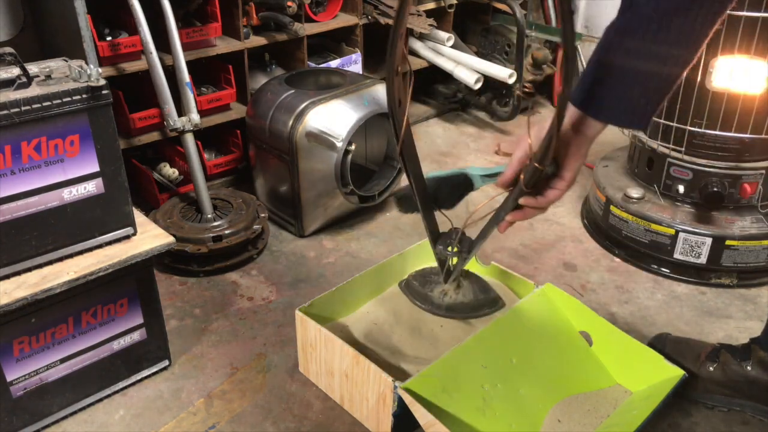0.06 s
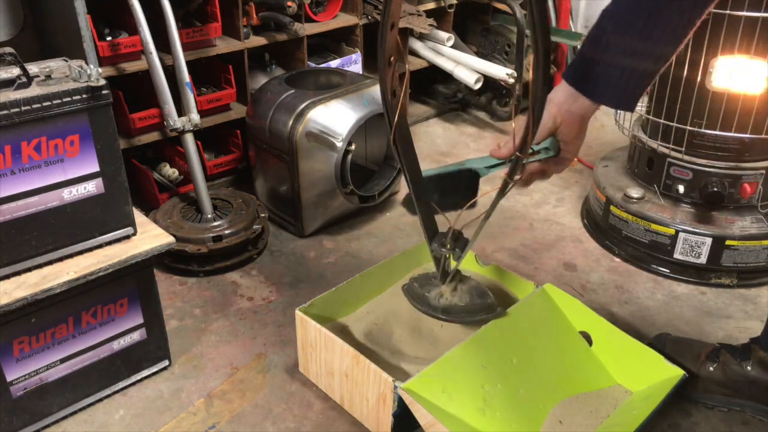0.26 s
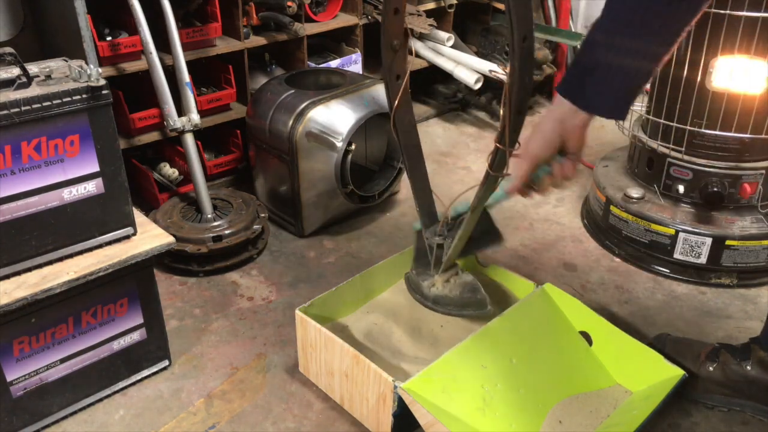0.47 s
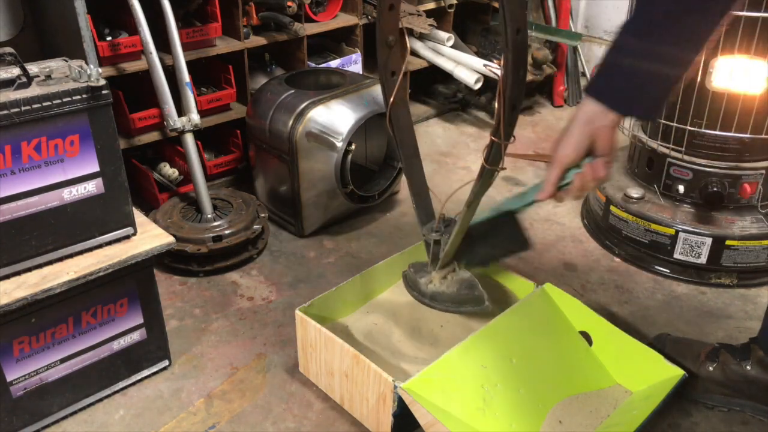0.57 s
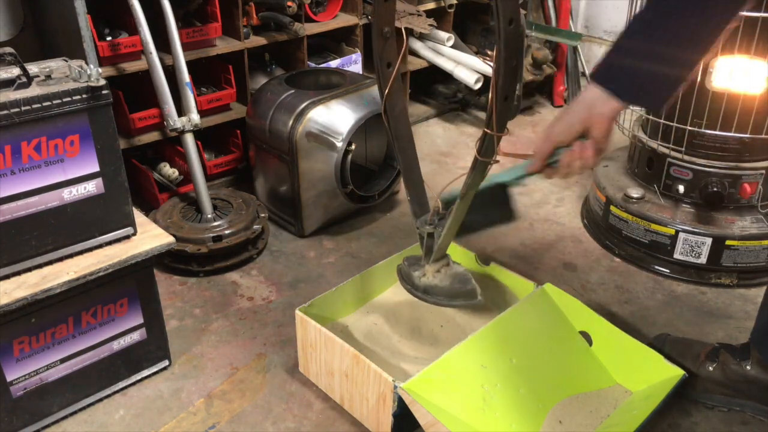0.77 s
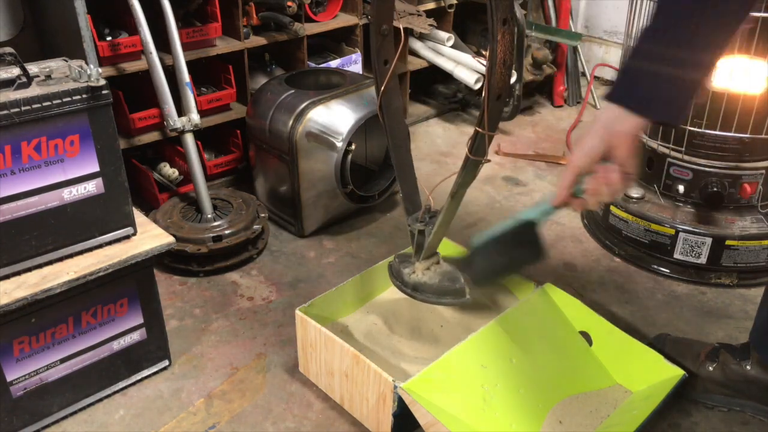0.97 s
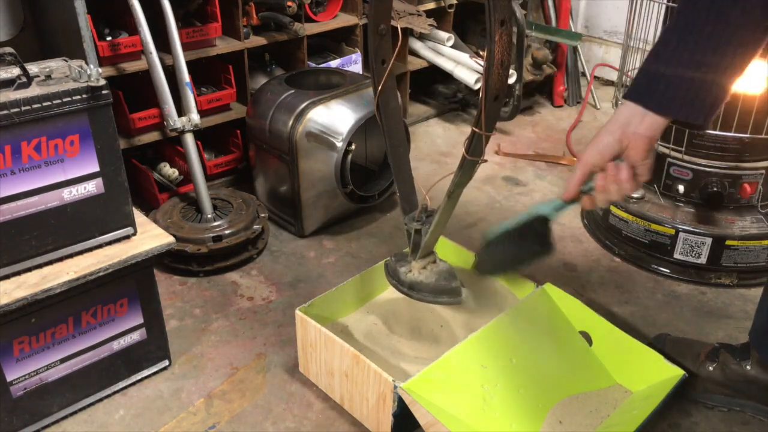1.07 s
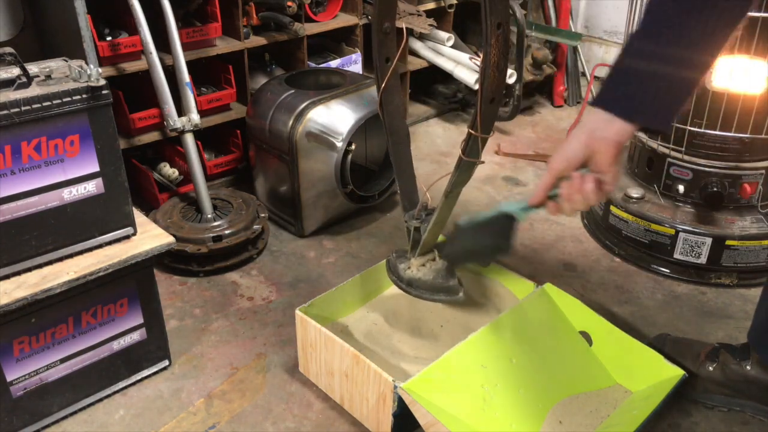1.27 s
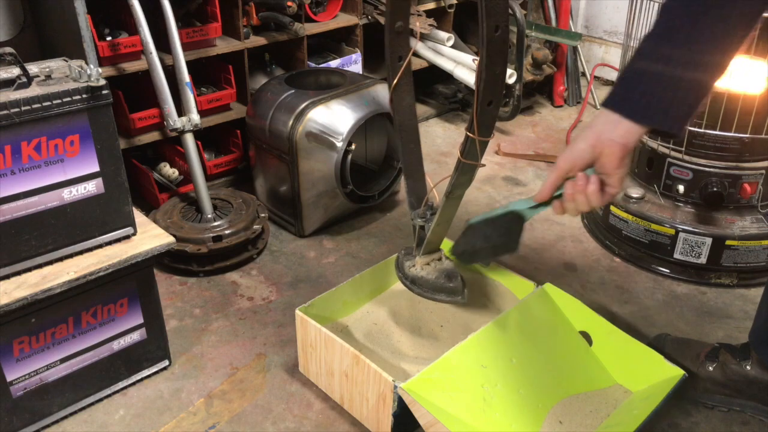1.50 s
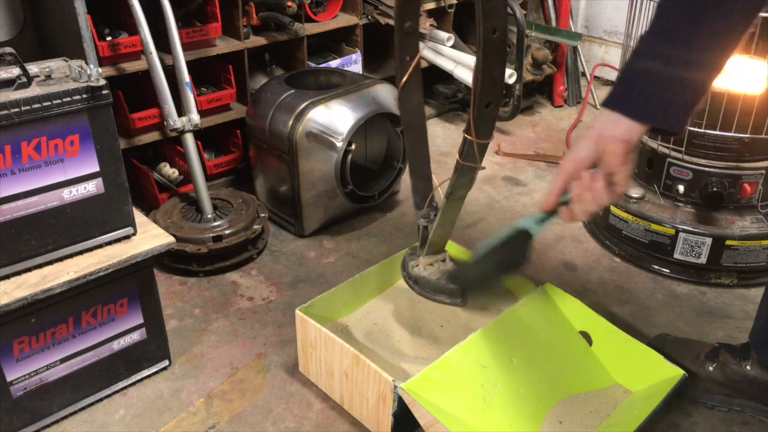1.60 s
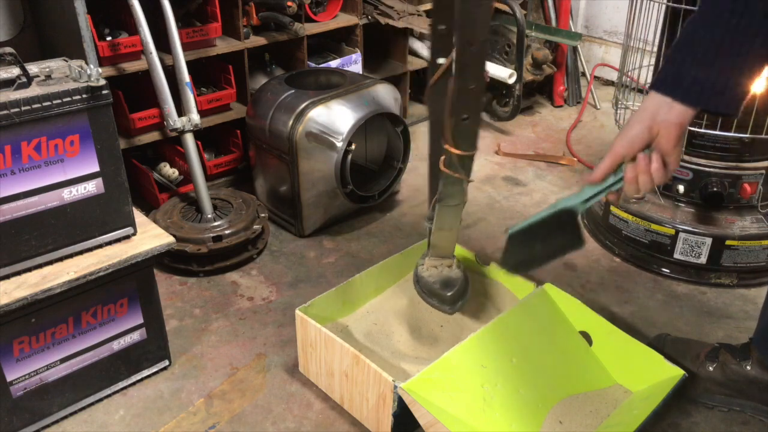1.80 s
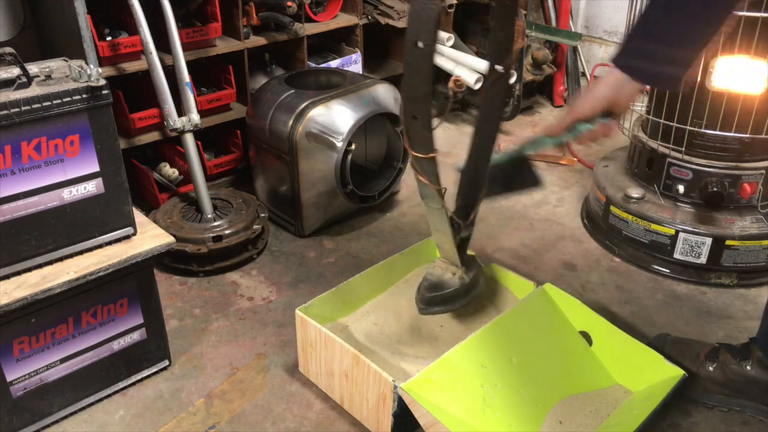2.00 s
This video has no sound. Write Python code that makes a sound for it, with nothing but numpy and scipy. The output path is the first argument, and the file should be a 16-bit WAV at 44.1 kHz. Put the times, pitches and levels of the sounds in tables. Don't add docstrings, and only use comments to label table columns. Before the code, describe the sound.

Stiff bristles scratch and hiss across a sandy iron casting, with small knocks, in a garage

```python
import sys
import numpy as np
from scipy import signal
from scipy.fft import rfft, irfft, next_fast_len
from scipy.io import wavfile

SR = 44100
rng = np.random.default_rng(int(sys.argv[2]) if len(sys.argv) > 2 else 0)


def convert_level_to_amplitude(level_db):
    exponent = np.asarray(level_db, float) / 20
    return 10 ** exponent


def master_out(mix):
    frames = np.transpose(np.atleast_2d(mix))
    ceiling = np.clip(frames, -1, 1)
    pcm = np.round(ceiling * 32767).astype(np.int16)
    wavfile.write(sys.argv[1], SR, pcm)


N = 90404
SETTLE_T60_S = 0.11


def rms_one(x):
    return x / np.sqrt(np.mean(x ** 2) + 1e-20)


def drift(rate_hz):
    r = np.exp(-80 * np.pi * rate_hz / SR)
    noise = rng.standard_normal(N // 40 + 2002)
    slow = signal.lfilter([1], [1, -2 * r, r * r], noise)[2000:]
    return np.interp(np.arange(N) / 40, np.arange(len(slow)), rms_one(slow))


def resonate(x, hz, width_hz):
    r = np.exp(-np.pi * width_hz / SR)
    zeros = np.array([1, 0, -1]) * (1 - r * r) / 2
    poles = [1, -2 * r * np.cos(2 * np.pi * hz / SR), r * r]
    return signal.lfilter(zeros, poles, x + 1e-18)


def high(x, hz):
    return signal.sosfilt(signal.butter(2, hz, "high", fs=SR, output="sos"), x)


def coloured(pair, spectrum, patchy_db, control_db=0, tilt=0):
    out, table = 0, np.array(spectrum)
    edges = 18 * 2 ** np.arange(0, 10.1, 1 / 3)
    for k, (low, top) in enumerate(zip(edges, edges[1:])):
        hz = np.sqrt(low * top)
        if hz > .7 * table[0, 0]:
            level_db = np.interp(np.log(hz), np.log(table[:, 0]), table[:, 1])
            level_db = level_db + patchy_db * drift(16.0)
            back_db = -tilt * control_db * np.clip(np.log2(12000 / hz) / 2, 0, 1)
            band = signal.butter(2, [low, top], "band", fs=SR, output="sos")
            out = out + convert_level_to_amplitude(level_db + back_db) * signal.sosfilt(band, pair[k % 2])[-N:]
    return rms_one(out)


def settle(env, t60_s):
    fall_db = 60 / t60_s * np.arange(N) / SR
    return convert_level_to_amplitude(np.maximum.accumulate(20 * np.log10(env + 1e-9) + fall_db) - fall_db)


# f/Hz, level/dB per Hz
RUMBLE = [(30, -34), (54, -1), (120, -0.5), (164, -5.5), (215, -14), (341, -17), (803, -24.5),
          (1800, -29.5), (4000, -32), (15400, -37)]
# f/Hz, level/dB rms
FAN_LINES = [(29.3, -64), (58, -64)]


def heater():
    t = np.arange(N) / SR
    lines = sum(convert_level_to_amplitude(db) * np.sqrt(2) * np.sin(2 * np.pi * hz * t) for hz, db in FAN_LINES)
    noise = rng.standard_normal((2, N + SR // 2))
    return convert_level_to_amplitude(-54) * coloured(noise, RUMBLE, 0.86) + lines


def garage(x):
    t60_s = 0.18
    size = next_fast_len(N + SR)
    w = 2 * np.pi * np.arange(size // 2 + 1) / size
    lags = rng.uniform(.008, 0.039, 10) * SR
    wet = 0
    for k, lag in enumerate(lags):
        loop = convert_level_to_amplitude(-60 * lag / SR / t60_s) * np.exp(-1j * w * lag)
        wet = wet + (-1) ** k * (1 / (1 - loop) - 1)
    return irfft(rfft(x, size) * wet / (1 + 1j * w / 2.4), size)[:N]


def grains():
    per_s, spread_db = 14000, 2.5
    sizes = convert_level_to_amplitude(spread_db * np.minimum(rng.exponential(1, N), 5)) * rng.choice([-1, 1], N)
    return rms_one(sizes * (rng.random(N) < per_s / SR))


# t/s, peak level/dB, f/Hz
STRAY_GRAINS = [(1.7934, -43, 13500), (1.8215, -45, 6000), (1.836, -44, 11100), (1.8415, -37, 13000),
                (1.8534, -48, 14000), (1.8725, -42, 7000), (1.8854, -39, 13000), (1.9014, -55, 5950),
                (1.9265, -35.5, 14000), (1.9354, -44, 12000), (1.9564, -52, 14400), (1.9607, -40.5, 6500),
                (.1098, -42, 14500), (1.9894, -52, 13500)]


def strays():
    t60_s = .004
    out, t = np.zeros(N), np.arange(600) / SR
    for s, db, hz in STRAY_GRAINS:
        i = int(s * SR)
        burst = convert_level_to_amplitude(-60 * t / t60_s) * rng.standard_normal(600)
        out[i:i + 600] += convert_level_to_amplitude(db - 5) * resonate(burst, hz, 5000)
    now = np.arange(N) / SR
    trickle = np.where((now >= 1.4) & (now <= 1.9), convert_level_to_amplitude(-63), 0)
    return out + settle(trickle, SETTLE_T60_S) * high(high(grains(), 9000), 9000)


# t/s, length/s, level/dB, f/Hz, width/Hz
BOX_DRAGS = [(-0.004, 0.18, -61.5, 310, 68), (0.108, 0.044, -56, 1280, 1190), (.244, 0.04, -47.5, 234, 151),
             (.245, 0.054, -51.5, 730, 402), (0.296, 0.051, -48.5, 600, 600), (0.355, 0.028, -47, 503, 480),
             (0.369, 0.01, -49.5, 1410, 800), (0.775, 0.13, -63, 1110, 604), (1.212, 0.03, -61.5, 980, 120),
             (1.875, 0.053, -67.5, 1947, 30), (1.91, 0.023, -62, 3720, 150),
             (1.918, 0.035, -64.5, 2006, 40)]


def box():
    t, out, rough = np.arange(N) / SR, 0, rng.standard_normal(N)
    for s, length, db, hz, width_hz in BOX_DRAGS:
        age = np.clip((t - s) / length, 0, 9)
        swell = 2.94 * age * np.exp(-1.6 * age ** 2)
        out = out + convert_level_to_amplitude(db) * swell * rms_one(resonate(rough, hz, width_hz))
    return out


# t/s, peak level/dB, f/Hz, t60/s
HARD_KNOCKS = [(.0655, -57, 6600, 0.025), (.072, -53, 6300, .015), (.069, -51, 3800, .015),
               (1.3225, -47, 1780, .03), (1.6262, -52, 1800, .03), (0.1264, -47.5, 1022, 0.044),
               (.1262, -43, 2000, .015), (.1262, -46, 3900, .01), (.2475, -36, 240, 0.05),
               (.251, -35, 310, .045), (.247, -43, 707, 0.065), (.2515, -35, 800, .03),
               (.258, -41.5, 438, 0.077), (.261, -48, 6850, .015), (.292, -40, 650, .03),
               (0.297, -34, 525, 0.03), (.313, -42, 620, .02), (.326, -42, 600, .025),
               (0.3619, -20, 3220, 0.008), (.3622, -27, 14500, .005), (.3622, -30, 9800, .005),
               (.3638, -29, 4100, .012), (.3705, -33, 1950, .02), (.3686, -30, 3300, .01),
               (.3682, -31, 4800, .008), (0.362, -35, 2760, 0.02), (.362, -18, 7200, 0.0049),
               (0.363, -25.5, 4140, 0.01), (0.37, -38, 1357, .035), (0.5762, -34, 4540, 0.012),
               (.5752, -40, 2000, .02), (.575, -48, 950, .03), (.5755, -38, 5400, .01),
               (0.576, -40, 3550, 0.03), (.5735, -36, 11100, .015), (0.969, -35, 2100, 0.02),
               (.975, -43, 1900, .04), (0.9694, -38, 3430, 0.012), (.9692, -33, 12800, .01),
               (.9708, -38, 6000, .008), (1.2118, -31, 5200, 0.0047), (1.325, -33, 3000, .015),
               (1.323, -37, 4750, 0.02), (1.325, -36, 4350, .012), (1.626, -50, 2830, 0.025),
               (1.6258, -46, 4500, .015), (1.6258, -50, 3500, .02), (1.876, -54, 3800, 0.012),
               (1.8765, -56, 2000, .015), (2.036, -54, 1900, 0.05), (2.034, -57, 2300, .02)]


def knocks():
    attack_s = .0004
    t, out = np.arange(2500) / SR, np.zeros(N + 2500)
    rough = 1 + .25 * drift(190)
    for s, db, hz, t60 in HARD_KNOCKS:
        i = int(s * SR)
        env = convert_level_to_amplitude(db - 60 * t / t60) * (1 - np.exp(-t / attack_s))
        out[i:i + 2500] += env * np.sin(2 * np.pi * hz * t)
    return out[:N] * rough


# f/Hz, width/Hz, level/dB
IRON_MODES = [(955, 260, -14.5), (1890, 385, -2), (2330, 810, -1.5), (3050, 570, 1.5), (3625, 200, 2),
              (4230, 790, -2), (4460, 440, -11), (6500, 230, -3)]


def iron(x):
    body = 0
    for k, (hz, width_hz, db) in enumerate(IRON_MODES):
        body = body + (-1) ** k * convert_level_to_amplitude(db) * resonate(x, hz, width_hz)
    return body + convert_level_to_amplitude(-16) * high(high(x, 1640), 1640) * .5


# t/s, peak level/dB, brightness level/dB, t60/s, attack/s
LANDINGS = [(0.063, -33, -9.5, 0.085, 0.007), (.118, -45, -13, 0.04, 0.0032),
            (.1258, -38, -15, 0.018, 0.0004), (0.241, -42.5, 13.5, 0.0097, .0004),
            (0.251, -22, 2.5, 0.031, 0.00084), (0.2592, -20.5, -0.5, 0.024, 0.00075),
            (0.2796, -32, 3, 0.018, .0004), (0.313, -31.5, 4.5, 0.016, .0005),
            (0.3205, -32, 5, 0.025, 0.0007), (0.3295, -32, 1, .018, .0005), (0.357, -43, 13, .015, .0004),
            (0.3617, -17.5, 1.5, 0.022, .0003), (0.3672, -16.5, -7.5, 0.024, 0.00038),
            (0.378, -24.5, 1.5, .05, .002), (0.3854, -38, 15, 0.009, 0.0005),
            (0.5716, -29, 1, 0.065, 0.0021), (0.9675, -29, 4, 0.05, 0.0018), (1.186, -35, 1, 0.046, 0.0015),
            (1.2114, -35.5, 13.5, 0.019, 0.00052), (1.323, -33.5, 4, 0.036, 0.0013),
            (1.6264, -32, -3.5, 0.056, .0004), (1.876, -45, -10.5, .03, .001),
            (2.034, -43, -24, 0.046, .0005)]


def taps():
    trim_db = -7.5
    t, dull, bright = np.arange(N) / SR, np.zeros(N), np.zeros(N)
    for s, db, bright_db, t60, attack in LANDINGS:
        age = np.maximum(t - s, 0)
        env = convert_level_to_amplitude(db + trim_db - 60 * age / t60) * (1 - np.exp(-age / attack))
        dull = dull + env
        bright = bright + env * convert_level_to_amplitude(bright_db)
    return 1.36 * iron(dull * grains()) + bright * high(high(grains(), 2950), 2950)


# f/Hz, level/dB per Hz
BRISTLE_HISS = [(710, -39), (1200, -15.5), (2000, -16), (2600, -11.5), (6000, -4), (9000, -3), (12500, 0),
                (15400, -3)]
# t/s, level/dB
SET_DOWN_SPEED = [
    (.165, -73),
    (.19, -57),
    (.243, -57),
    (.262, -43),
    (.305, -52.5),
    (.325, -48),
    (.358, -47.5),
    (.385, -43.5),
    (.45, -67),
]
# t/s, level/dB
STROKE_SPEED = [(0.577, -50), (.61, -53.5), (.72, -43.5), (.775, -45.5), (.85, -53.5), (.9, -44.5),
                (.955, -49.5), (1.0, -52.5), (1.11, -44.5), (1.17, -56.5), (1.235, -41), (1.3, -53.5),
                (1.43, -42.5), (1.49, -52), (1.56, -50), (1.61, -57.5), (1.73, -46), (1.787, -56)]
# touch t/s, lift t/s, level/dB
IRON_SCRAPES = [(.17, 0.23, -58), (0.248, 0.314, -50), (0.313, 0.352, -50.5), (0.366, 0.398, -42.5),
                (0.572, .8, -53.5), (0.881, 1, -55), (0.973, 1.12, -54.5), (1.201, 1.31, -53.5),
                (1.319, 1.477, -52), (1.504, 1.57, -59.5), (1.629, 1.778, -55.5), (1.875, 1.96, -63.5)]


def brush():
    full_speed_db, scrape_fade_db = -46, 9
    low_hiss_share = .45
    t, scrape = np.arange(N) / SR, np.zeros(N)
    set_down_db = np.interp(t, *np.transpose(SET_DOWN_SPEED), left=-200, right=-200)
    stroke_db = np.interp(t, *np.transpose(STROKE_SPEED), left=-200, right=-200)
    speed_db = np.maximum(set_down_db, stroke_db)
    for touch, lift, db in IRON_SCRAPES:
        on = (t >= touch) & (t < lift)
        scrape[on] = convert_level_to_amplitude(db - scrape_fade_db * (t[on] - touch) / (lift - touch))
    flutter = convert_level_to_amplitude(0.82 * drift(31) + 1.1 * drift(140))
    swing_db = np.clip(speed_db - full_speed_db, -14, 3)
    hiss = coloured([grains(), grains()], BRISTLE_HISS, 1.0, swing_db, low_hiss_share)
    sweeping = settle(convert_level_to_amplitude(speed_db), SETTLE_T60_S) * hiss
    scraping = settle(scrape, SETTLE_T60_S) * rms_one(iron(grains()))
    return flutter * (sweeping + scraping)


def scene():
    work = brush() + taps() + knocks() + box() + strays()
    return np.tile(work + convert_level_to_amplitude(-17.5) * garage(work) + heater(), (2, 1))


# f/Hz, width/Hz, share removed
HOUSING_DIPS = [
    (7660, 810, 0.39),
    (10340, 600, 0.53),
]


def housing(x):
    for hz, width_hz, share in HOUSING_DIPS:
        x = x - share * resonate(x, hz, width_hz)
    return x


def roll_off(x):
    return signal.sosfilt(signal.butter(12, 16810, fs=SR, output="sos"), x)


def record(dry):
    cut = signal.ellip(12, .3, 42, 15800, fs=SR, output="sos")
    mix = signal.sosfilt(cut, housing(dry))
    return roll_off(mix)


dry = scene()
out = record(dry)
master_out(out)
```